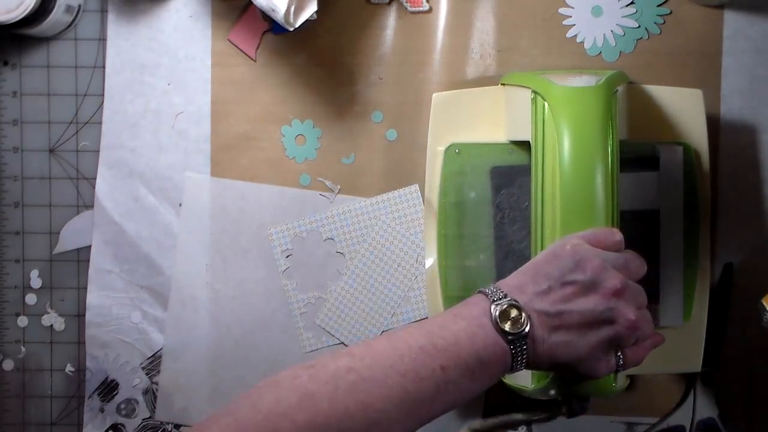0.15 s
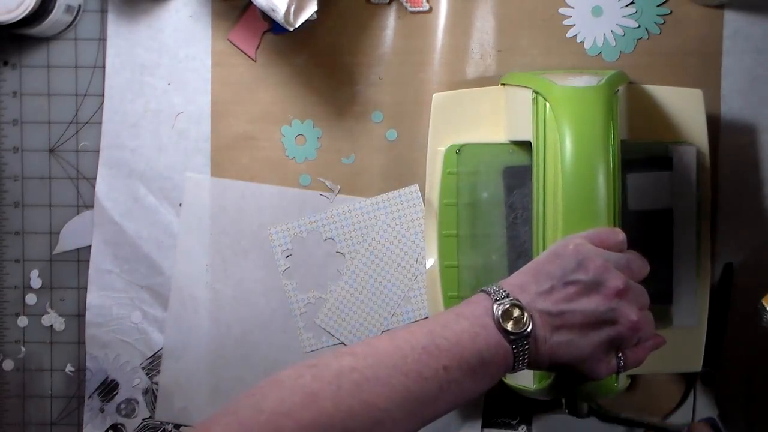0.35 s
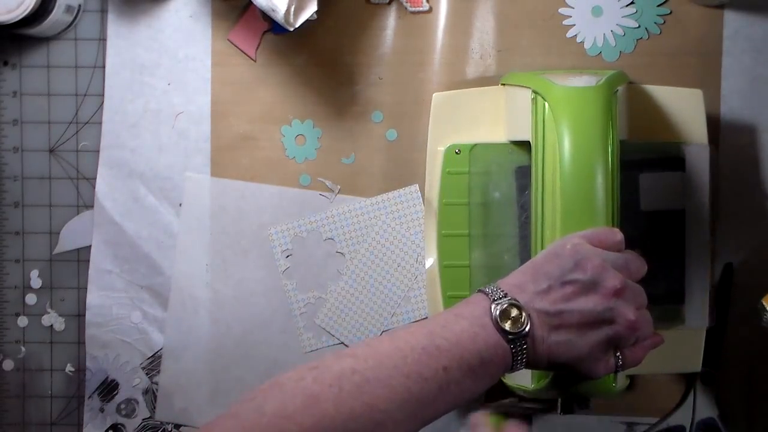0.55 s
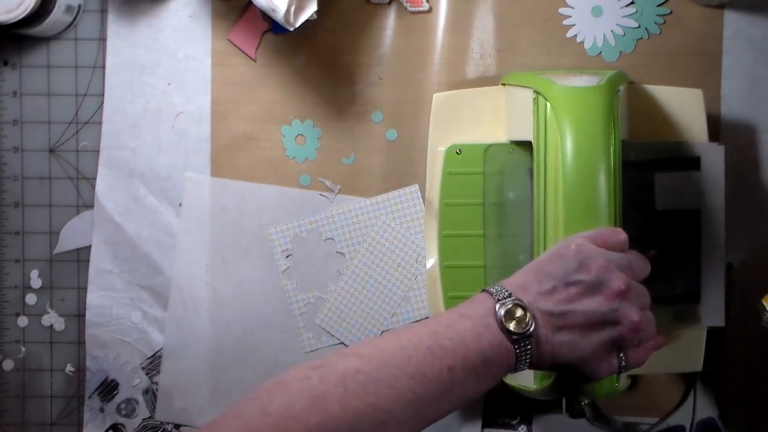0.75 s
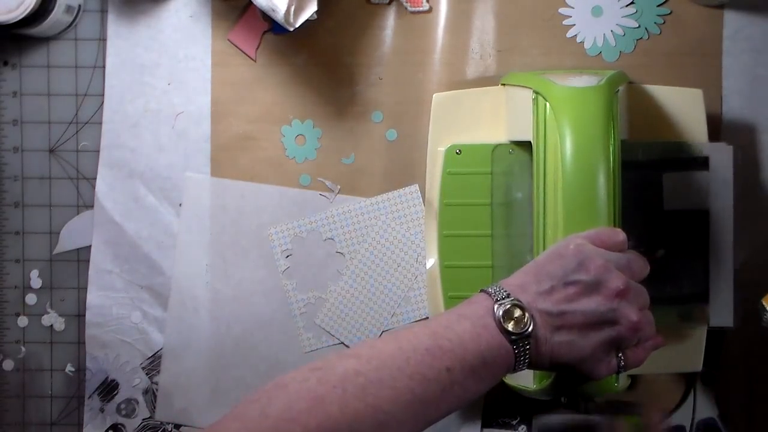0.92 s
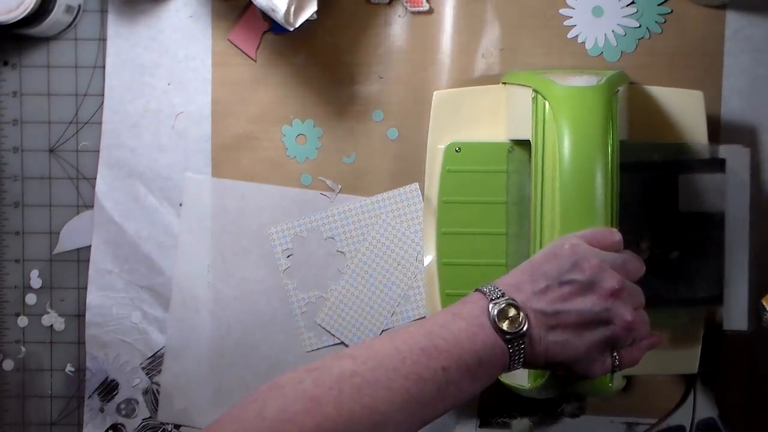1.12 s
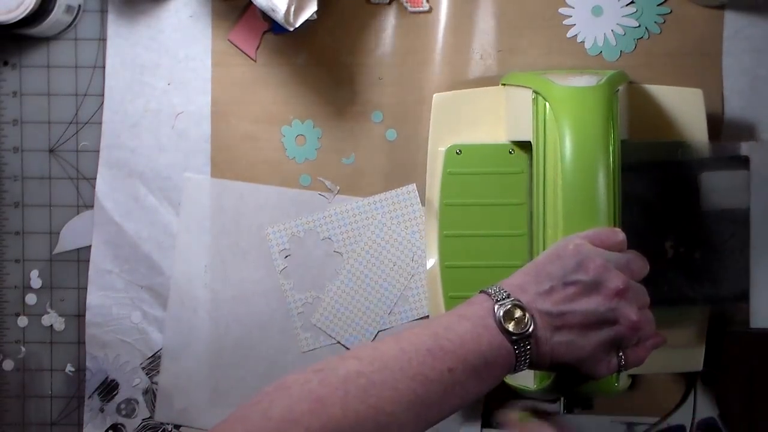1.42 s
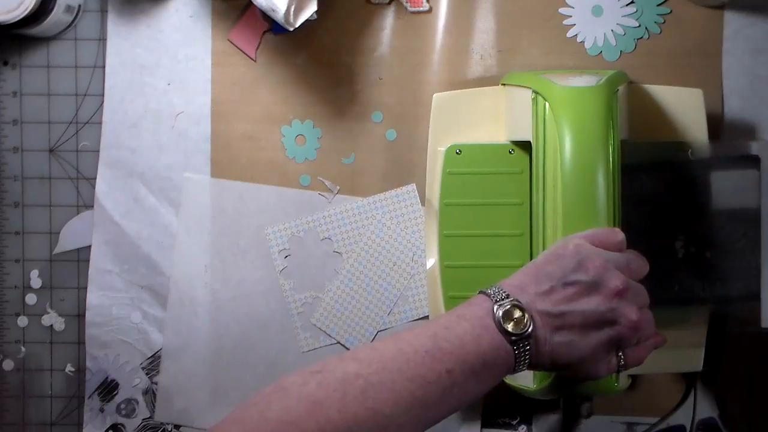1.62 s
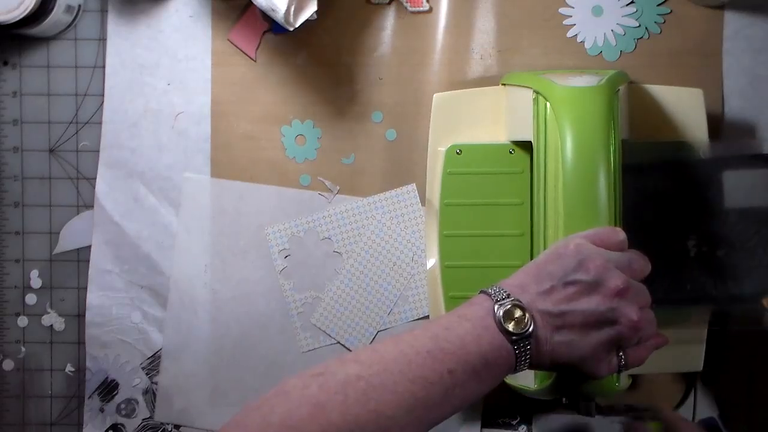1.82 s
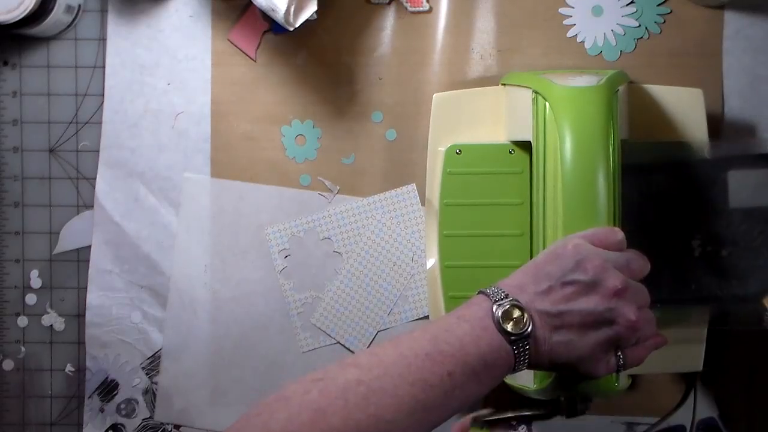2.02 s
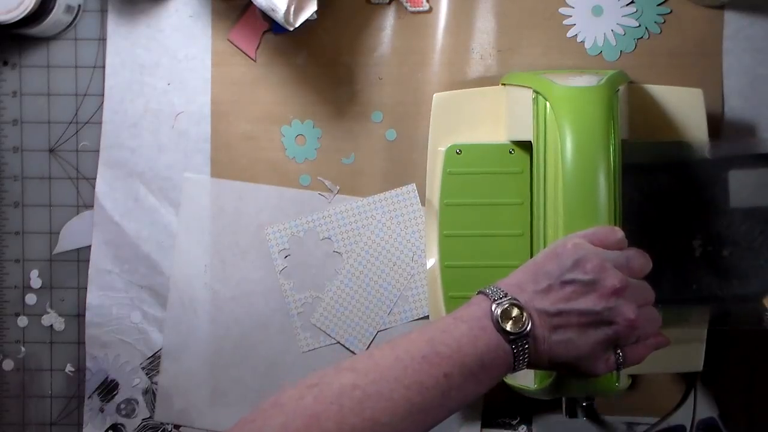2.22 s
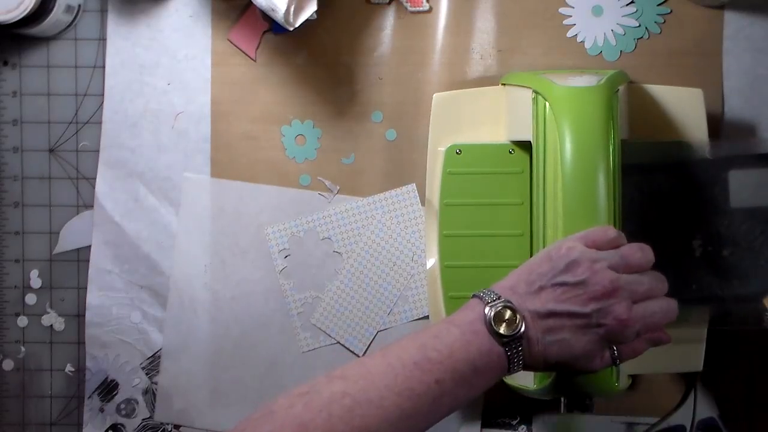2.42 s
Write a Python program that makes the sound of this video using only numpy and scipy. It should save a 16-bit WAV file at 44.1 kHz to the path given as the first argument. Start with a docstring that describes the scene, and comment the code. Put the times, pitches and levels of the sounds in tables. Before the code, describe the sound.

A hand-cranked die-cutting machine creaks and snaps, releases its plates with a clack, then knocks loosely.

```python
"""Contact noise of a hand-cranked die-cutting machine

On a craft table in a small room, plates creak and snap between rollers, spring free with a clack,
then the unloaded crank and gears knock. Each contact is a tick, a brief noise rattle and a room tail,
filtered by body resonances. Damped sines give table thuds and the crank's clinks; random grains and
noise give the rubbing; filtered noise gives the room's hum, rumble and hiss."""
import sys
import numpy as np
from scipy import signal
from scipy.fft import rfft, irfft
from scipy.io import wavfile
from scipy.ndimage import uniform_filter1d

SR = 44100
rng = np.random.default_rng(int(sys.argv[2]) if len(sys.argv) > 2 else 0)


def generate_wav(sig):
    """Save sig (samples, or channels by samples) to the path in sys.argv[1] as 16-bit PCM at SR."""
    pcm = np.round(np.clip(np.atleast_2d(sig).T, -1, 1) * 32767).astype(np.int16)
    wavfile.write(sys.argv[1], SR, pcm)


N = 112454
SIZE = 16384  # samples in one contact response
HZ = np.fft.rfftfreq(SIZE, 1 / SR)

# Steady room noise: f/Hz, relative spectral density/dB
AIR_COLOUR = [(12, -24), (20, 2.5), (55, 1), (263, -20.5), (481, -41), (551, -12), (687, -17.5),
              (809, -19.5), (1160, -34), (3370, -26), (3650, -28.5), (4430, -29.5), (14000, -35)]
# Its stereo width: f/Hz, side minus mid/dB
AIR_WIDTH = [(30, -14.5), (120, -1), (500, -11), (2000, 1), (8000, -6)]
# Its left-right lean: f/Hz, share of the mid added to the side (positive leans left)
AIR_LEAN = [(30, -0.25), (100, -0.31), (300, -0.13), (1000, 0.036)]
AIR_DB = -54.5
HUM_HZ, HUM_WIDTH_HZ, HUM_DB = 103.1, 36, -60
RUMBLE_HZ, RUMBLE_WIDTH_HZ, RUMBLE_DB = 30.1, 13, -61

# Plates rubbing through the rollers: t/s, level/dB
RUB_LEVEL = [(0, -57.5), (.3, -56), (.66, -56.5), (.85, -51.5), (1.15, -59), (1.35, -51.5), (1.47, -60),
             (1.7, -59), (1.85, -48.5), (2.15, -52), (2.42, -51), (2.55, -49.5)]
# Rubbing spectrum before the housing: f/Hz, relative spectral density/dB
RUB_COLOUR = [(80, -13.5), (200, -0.5), (400, 3.5), (900, -4), (1200, 1), (2500, -7), (5000, -16.5),
              (9000, -16), (14000, -18.5)]
GRAINS_PER_S, GRAIN_SPREAD_DB = 300, 1
RUB_SMOOTH = 1  # rms of the smooth scrape relative to the grains

# Contacts, all five tables: t/s, build-up/s, level/dB, bass/dB, ring/dB, treble/dB
# Loaded rollers and crank slip
CREAKS = [(0.012, 0.004, -21, -1.5, 20.5, 15), (0.027, 0.0041, -10, -8.5, 8, -23),
          (0.147, 0.0075, -33.5, 26, 20.0, 4), (0.162, 0.0027, -21, 8.5, 6.5, -2),
          (0.187, 0.0033, -29.5, 20, -7, 22), (0.255, 0.0017, -12.5, 3.5, -9, 10),
          (0.28, 0.0034, -3, -1.5, -8.5, 2), (0.383, 0.0017, -10, 2, 3, -24),
          (0.446, 0.0011, -11.5, -1.5, 3, 15), (0.559, 0.0013, -6.5, 0, -3, -34),
          (0.58, 0.0029, -32, 17, -5, -10), (0.594, 0.0025, -9.0, 1.5, 12.5, 0),
          (0.731, 0.0034, -6, -4.5, -10, -23), (0.761, 0.00099, 0.5, -8, -25, -3.5),
          (0.795, 0.0051, -18.5, 7, -14, 4), (0.85, 0.011, -30, 12, -2, -8),
          (0.893, 0.00276, -5, -10.5, -10, -11.3), (0.914, 0.0021, 0.5, -10, -16, -8),
          (0.961, 0.0016, -8.5, 7, 7.5, -42), (0.977, 0.00067, -6, 3.5, 2, -29),
          (1.07, 0.0017, -9.5, -0.5, 17, 4), (1.108, 0.0013, -12.5, -7, -17, 17.5)]
# Plates crack under pressure
SNAPS = [(0.0722, 0.00045, -11.5, -8, -1, 6), (0.156, 0.001, -11.6, 3, -24, -8.1),
         (0.2132, 0.00024, -5.5, -1, 4.5, 8), (0.412, 0.0038, -7.5, 8.5, -1, 7),
         (0.5028, 0.00012, -5, 6, -6.3, 5), (0.715, 0.0012, -16, 12, -4, -1.5),
         (1.0282, 0.00049, 2, -10.9, -15.5, -13), (1.208, 0.0038, -24, 9, 5, 14.2),
         (1.339, 0.0023, -18, -1, -1.5, 8)]
# Grit and plate edges tick
TICKS = [(.181, .001, -25, 9, -15, 11), (.3955, 0.00068, -38, -8, -14, 22),
         (.4072, 0.00045, -15.5, -19, 16, 11), (.832, 0.0024, -20, -12, 8, -14),
         (.939, 0.00063, -18.5, 28, -11, -3), (1.153, 0.0032, -25, -14, 10, 8),
         (1.183, 0.0028, -19.5, -4, 9, 4), (1.2505, 0.0025, -7, -13, -4, -1),
         (1.284, .001, -9.5, -25, 8, 0), (1.294, 0.0011, -9.5, -16, 13, -7),
         (1.374, 0.00085, -20, 3, 11, 6.5), (1.518, 0.0027, -26.5, 26, -4, -4),
         (1.539, 0.0011, -26.5, -4, -2, 5.5), (1.776, .001, -17, 12, -2, 2), (1.956, 0.0016, -13, 4, -6, 3),
         (2.4995, .0006, -4, 0, -13, -10)]
# Plates leave the rollers and settle
CLACKS = [(1.215, 0.0024, -20, 2.5, 17, -35), (1.226, 0.00084, -20.5, 2.7, 27, 6.5),
          (1.2548, 0.00085, 2, -7.5, 4, -7), (1.316, 0.00093, -31, -24, 19, 12),
          (1.399, 0.0029, -21.5, -12, 15, -26)]
# Unloaded gears take up their slack
KNOCKS = [(1.59, 0.018, -18, -9, 2, -11), (1.629, 0.0057, -11.5, -2, -1, 4),
          (1.741, 0.0011, -12.5, 5.5, 8.6, 8), (1.805, 0.0004, -8.5, 11.5, 2, 17),
          (1.8742, 0.00056, 1, 2.5, 12.5, 6), (1.9678, 0.0012, 1.5, 1.8, 1.5, 9.5),
          (2.01, 0.003, -14, 0.5, 7, 7.5), (2.042, 0.00067, -6, 12, 0, 15), (2.174, 0.0015, -21, 0, 0, 0),
          (2.2085, 0.0013, -10, 2, 0, 2), (2.2795, 0.0028, -3.5, -18, -5, -3),
          (2.289, 0.0025, -3.5, -2.5, -8, -21), (2.3415, 0.0036, -3.5, -6.5, 2, -10),
          (2.3505, 0.0037, -6, 1.5, -2, 4.5), (2.364, 0.0024, -12, 4, 5, 3), (2.503, 0.013, -16, 0, 4, -8)]
BASS_HZ, TREBLE_HZ = 740, 4180  # corners of the bass and treble columns

# Spectrum of each kind of contact, all five tables: f/Hz, relative level/dB
# Slipping rollers and crank
CREAK_COLOUR = [(50, -22), (150, -5.5), (300, 1.5), (600, 4.5), (900, 5.5), (1150, -2.5), (1900, 0.5),
                (3200, -5.5), (5500, -24.5), (8500, -26.5), (14000, -31)]
# Cracking plates
SNAP_COLOUR = [(50, -33), (150, -19), (300, -5), (600, -5), (900, -5), (1150, -4), (1900, 10), (3200, 4),
               (5500, -2.5), (8500, -4), (14000, -6)]
# Grit and plate edges
TICK_COLOUR = [(50, -34), (300, -32), (900, 3), (2000, -4), (4200, -3), (7000, -10), (14000, -17.5)]
# Plates springing free
CLACK_COLOUR = [(50, -1), (150, 9), (300, 11.5), (600, 16.5), (900, 8.0), (1150, 3), (1900, 6.5),
                (3200, 11.5), (5500, 6), (8500, -1.8), (14000, -7)]
# Loose gears
KNOCK_COLOUR = [(50, -3.3), (150, 7), (300, 2.5), (600, 10.5), (900, 11), (1150, 6.5), (1900, 8),
                (3200, 0.6), (5500, -11), (8500, -19), (14000, -45)]

# Resonances and dips, all four tables: f/Hz, width/Hz, lift/dB
# Plastic housing
HOUSING = [(156, 18, -5.5), (233.4, 39, 8), (329, 24.4, 13), (407, 13, 9.5), (456.5, 36, 10.5),
           (494, 6.7, 2.5), (572, 82, 10.5), (712, 15.4, 7), (744, 11.5, -14), (953, 97, 10),
           (1120, 140, -4), (1286, 26, 6.5), (1527, 37.4, 6.5), (1606, 135, 1.5), (1740, 39, -5.5)]
# Face of a plate
PLATE_FACE = [(1930, 98, 3), (2170, 104, -8), (2264, 80, 5.5), (2560, 43, 8), (3490, 59, 1.5),
              (3580, 70, 0), (4440, 72, 3), (7110, 260, 3.5), (7930, 1300, -3.5), (10200, 270, 1.5)]
# Freed plates
PLATES = [(435, 90, 9), (694, 80, 11), (926, 50, 9), (1570, 130, 7), (1812, 40, 12), (2335, 60, 4),
          (2838, 55, 6), (2995, 55, 7), (3157, 55, 6), (4070, 120, 6), (4650, 150, 3), (5300, 450, 7),
          (7150, 600, 6), (11750, 70, 9), (12500, 100, 9)]
# Gears
GEARS = [(2560, 61, 4), (2910, 170, -6.5), (4030, 200, 3.5), (4800, 380, 5.5), (5430, 990, -3.5),
         (6260, 130, 2.5), (7040, 110, 3.5), (8140, 660, -4.5), (10000, 200, -8), (10600, 280, 4),
         (11600, 420, 16), (13100, 260, 12)]
FINE_MODES_DB, FINE_WIDTH_HZ = 2.6, 45  # spread and spacing of the crowded upper modes

RATTLE_DB = 4  # unevenness of a rattle
TREBLE_HOLD, RATTLE_SPLIT_HZ = 0.59, 2200  # the treble rattles for this share of the hold time
# Room decay: f/Hz, T60/s
ROOM = [(200, 0.21), (550, 0.12), (1500, 0.11), (4000, 0.13), (12000, 0.11)]
# Stereo width of contacts and rubbing, before any offset by kind: f/Hz, side minus mid/dB
WIDTH = [(100, -6), (500, -12.5), (1300, -19.5), (2800, -11), (5500, -1), (10000, 0.5), (14000, 3)]

# Thuds of the table and the machine's base: t/s, f/Hz, level/dB
THUDS = [(1.256, 60, -36), (1.972, 105, -38), (2.287, 112, -36), (2.346, 109, -28), (2.35, 61, -38),
         (2.352, 313.4, -26)]
THUD_RISE_S, THUD_T60_S = 0.014, 0.14

# Steel crank against its shaft: t/s, level/dB
CLINKS = [(1.806, -40.5), (1.969, -74), (2.042, -40.5)]
# Modes of the crank: f/Hz, relative level/dB, T60/s
CRANK = [(6840, -12, 0.058), (9720, 3.5, 0.061), (9900, -10, 0.062), (10120, 1.5, 0.13), (9930, 1, 0.15),
         (10500, -8, 0.082), (10900, -2, 0.085), (12430, -3, 0.099), (13210, 1, 0.098), (13430, -10, .08)]
CLINK_SPREAD_HZ = 107  # standard deviation of the partials about each mode
EDGE_HZ = 14350  # upper band limit


def amp(db):
    """Level law: converts decibels to an amplitude ratio."""
    return 10 ** (np.asarray(db) / 20)


def unit(x):
    """Normalization: scales a signal to rms 1."""
    return x / np.sqrt(np.mean(x ** 2) + 1e-20)


def read(points, hz):
    """Interpolation: reads a table linearly on a logarithmic frequency axis."""
    f, value = np.transpose(points)
    return np.interp(np.log(hz + 1), np.log(f + 1), value)


def add(mix, s, sound):
    """Superposition: adds a sound to the mix from time s."""
    part = mix[:, max(round(s * SR), 0):][:, :sound.shape[-1]]
    part += sound[..., :part.shape[1]]


def stereo(mid, side):
    """Sum and difference: left is mid plus side, right is mid minus side."""
    return np.array([mid + side, mid - side])


def decay(t, t60):
    """Exponential damping: amplitude falls by 60 dB in t60 seconds."""
    return np.exp(-np.log(1000) * t / t60)


def below(hz, corner):
    """Crossover: weight near 1 well below the corner, near 0 well above it."""
    return 1 / (1 + (hz / corner) ** 4)


def bump(hz, centre, width):
    """Resonance curve: a bell of height 1, with its full width taken at half height."""
    return 1 / (1 + (2 * (hz - centre) / width) ** 2)


def lifts(modes, hz):
    """Modal response: sums the dB gains of a body's resonances and dips."""
    return sum(db * bump(hz, f, width) for f, width, db in modes)


def fine_modes():
    """Modal density: a random dB gain stands for many small, crowded upper resonances."""
    knots = np.arange(0, SR / 2, FINE_WIDTH_HZ)
    ripple = np.interp(HZ, knots, rng.standard_normal(len(knots)))
    return FINE_MODES_DB * ripple * np.clip(HZ / 1000 - .7, 0, 1)


def causal(db):
    """Minimum phase: the Hilbert transform of the log gain makes the body ring only after a blow."""
    log_gain = np.log(amp(np.concatenate([db, db[-2:0:-1]])))
    return np.exp(np.conj(signal.hilbert(log_gain)))[:len(db)]


def room_tail():
    """Reverberation: noise decays at a rate that depends on frequency."""
    hz, when, z = signal.stft(rng.standard_normal(SIZE), SR, nperseg=256)
    loss = amp(-60 * when / read(ROOM, hz)[:, None])
    return signal.istft(z * loss, SR)[1][:SIZE]


def flatten(z):
    """Spectral whitening: removes the broad colour so that the body alone sets it."""
    near, wide = (uniform_filter1d(abs(z) ** 2, size=bins) for bins in (41, 301))
    power = near + (wide - near) * np.clip(HZ / 1500 - 1, 0, 1)  # broader smoothing in the treble
    return z * causal(-10 * np.log10(abs(power) + 1e-9))


def chatter(rise, hold_s, tick_db, tail_db, tail_treble_db):
    """Contact excitation: spectrum of a tick, an uneven rattle that dulls quickly, and a room tail."""
    t = np.arange(SIZE) / SR
    rise = max(rise, 1 / SR)
    after = np.maximum(t - rise, 0) / hold_s
    high = 1 - below(HZ, RATTLE_SPLIT_HZ)

    slow_noise = unit(uniform_filter1d(rng.standard_normal(SIZE), size=30))
    clumps = amp(RATTLE_DB * np.clip(slow_noise, -2, 1.2))
    rattle = np.minimum(t / rise, 1) * clumps * rng.standard_normal(SIZE)
    slow = unit(rattle * np.exp(-after ** 2))
    fast = unit(rattle * np.exp(-(after / TREBLE_HOLD) ** 2))
    tail = unit(room_tail() * np.minimum(t / (rise + hold_s), 1))

    z = (1 - high) * rfft(slow) + high * rfft(fast)
    z = z + amp(tail_db + tail_treble_db * high) * rfft(tail)
    tick = amp(tick_db) * np.exp(-2j * np.pi * HZ * rise)  # impulse at the end of the build-up
    return flatten(z / np.sqrt(SIZE) + tick)


def blows(rows, colour, modes, ring_hz, ring_width_hz, hold_s, tick_db, tail_db, tail_treble_db, side_db):
    """Source-filter principle: each contact excites a body with its own bass, ring and treble."""
    out = np.zeros((2, N))
    body = read(colour, HZ) + lifts(modes, HZ) + fine_modes()
    low, high = below(HZ, BASS_HZ), 1 - below(HZ, TREBLE_HZ)
    ring = bump(HZ, ring_hz, ring_width_hz)
    width = causal(read(WIDTH, HZ) + side_db)
    for s, rise, db, bass_db, ring_db, treble_db in rows:
        tone = causal(body + db + bass_db * low + ring_db * ring + treble_db * high)
        mid = irfft(tone * chatter(rise, hold_s, tick_db, tail_db, tail_treble_db))
        # the side has its own noise, with less tick and more tail
        side = irfft(tone * width * chatter(rise, hold_s, tick_db - 16, tail_db + 7, tail_treble_db))
        add(out, s, stereo(mid, side))
    return out


def narrow_noise(centre, width):
    """Narrow-band noise: a narrow band wavers in level because its components beat."""
    hz = np.fft.rfftfreq(N, 1 / SR)
    return unit(irfft(rfft(rng.standard_normal(N)) * bump(hz, centre, width), N))


def air():
    """Filtered noise: steady low room noise and faint hiss, with the bass leaning right."""
    hz = np.fft.rfftfreq(N, 1 / SR)
    a, b = rfft(rng.standard_normal((2, N)))
    tone = amp(read(AIR_COLOUR, hz))
    mid = irfft(a * tone, N)
    side = irfft((b * amp(read(AIR_WIDTH, hz)) + a * read(AIR_LEAN, hz)) * tone, N)
    return amp(AIR_DB) * unit(stereo(mid, side))


def hum():
    """Narrow-band noise: a wavering hum, stronger on the right."""
    return amp(HUM_DB) * narrow_noise(HUM_HZ, HUM_WIDTH_HZ) * amp([[-2.5], [2]])


def rumble():
    """Narrow-band noise: a deep, unsteady room rumble, stronger on the right."""
    return amp(RUMBLE_DB) * narrow_noise(RUMBLE_HZ, RUMBLE_WIDTH_HZ) * amp([[-3], [2.2]])


def rubbing():
    """Stick-slip friction: fine random grains and a smooth scrape, heard through the housing."""
    size = amp(GRAIN_SPREAD_DB * np.minimum(rng.exponential(1, (2, N)), 4))
    struck = rng.random((2, N)) < GRAINS_PER_S / SR
    grains = size * struck * rng.choice([-1, 1], (2, N))
    drive = unit(grains) + RUB_SMOOTH * rng.standard_normal((2, N))
    tone = read(RUB_COLOUR, HZ) + lifts(HOUSING, HZ)
    mid = signal.fftconvolve(drive[0], irfft(causal(tone)))[:N]
    side = signal.fftconvolve(drive[1], irfft(causal(tone + read(WIDTH, HZ))))[:N]
    level_db = np.interp(np.arange(N) / SR, *np.transpose(RUB_LEVEL))
    return unit(stereo(mid, side)) * amp(level_db)


def creaks():
    """Frictional slip: loaded rollers and crank excite the housing and plate face."""
    return blows(CREAKS, CREAK_COLOUR, HOUSING + PLATE_FACE, ring_hz=1010, ring_width_hz=190,
                 hold_s=0.011, tick_db=-17, tail_db=-8.5, tail_treble_db=6.5, side_db=-3.5)


def snaps():
    """Sudden stress release: plates crack under pressure, with a strong initial tick."""
    return blows(SNAPS, SNAP_COLOUR, HOUSING + PLATE_FACE, ring_hz=2330, ring_width_hz=1000,
                 hold_s=0.007, tick_db=-5.5, tail_db=-8.5, tail_treble_db=5.5, side_db=-4)


def ticks():
    """Small impacts: grit and plate edges excite the housing and plate face."""
    return blows(TICKS, TICK_COLOUR, HOUSING + PLATE_FACE, ring_hz=1990, ring_width_hz=1300,
                 hold_s=0.0078, tick_db=-10, tail_db=-0.5, tail_treble_db=0, side_db=-3.5)


def clacks():
    """Elastic release: the plates leave the rollers, settle and sound their own modes."""
    return blows(CLACKS, CLACK_COLOUR, PLATES, ring_hz=1540, ring_width_hz=640,
                 hold_s=0.011, tick_db=-19, tail_db=-10.5, tail_treble_db=1.5, side_db=-5)


def thuds():
    """Damped oscillation: low swings of table top and machine base, stronger on the right."""
    out, t = np.zeros((2, N)), np.arange(SIZE) / SR
    fade = np.minimum(t / THUD_RISE_S, 1) * decay(t, THUD_T60_S)
    for s, hz, db in THUDS:
        add(out, s, amp(db) * fade * np.sin(2 * np.pi * hz * t))
    return out * amp([[-1.5], [1.5]])


def knocks():
    """Impact across a clearance: unloaded gears take up their slack in the housing."""
    return blows(KNOCKS, KNOCK_COLOUR, HOUSING + GEARS, ring_hz=1536, ring_width_hz=284,
                 hold_s=0.013, tick_db=-18, tail_db=-10, tail_treble_db=2.5, side_db=-3.5)


def clinks():
    """Modal ringing: each steel crank mode is a cluster of close partials, so the ring is rough."""
    out, t = np.zeros((2, N)), np.arange(SIZE) / SR
    for s, db in CLINKS:
        for hz, mode_db, t60 in CRANK:
            detune, phase = rng.standard_normal((2, 8, 2, 1))  # 8 partials in each of 2 channels
            cycles = (hz + CLINK_SPREAD_HZ * detune) * t + phase
            ring = np.sin(2 * np.pi * cycles).sum(axis=0) / np.sqrt(8)
            add(out, s, amp(db + mode_db) * decay(t, t60) * ring)
    return out


def scene():
    """Superposition: the machine's contacts sound over thuds, rubbing and the room."""
    room = air() + hum() + rumble()
    rub = rubbing()
    machine = creaks() + snaps() + ticks() + clacks() + knocks() + clinks()
    machine = machine * amp([[-.2], [.2]])  # slightly to the right
    return machine + thuds() + rub + room


def record(dry):
    """Band limiting: a linear-phase low-pass filter removes the highest treble."""
    lowpass = signal.firwin(101, EDGE_HZ, window=("kaiser", 7), fs=SR)
    return signal.oaconvolve(dry, lowpass[None], "same")


dry = scene()
out = record(dry)
generate_wav(out)
```